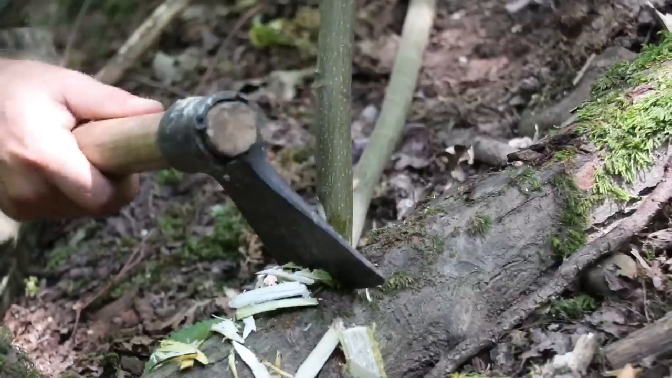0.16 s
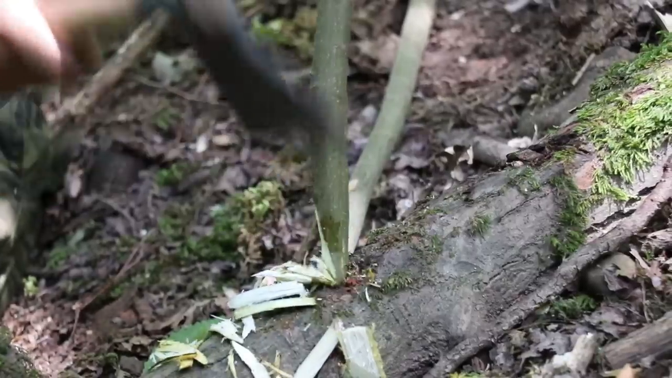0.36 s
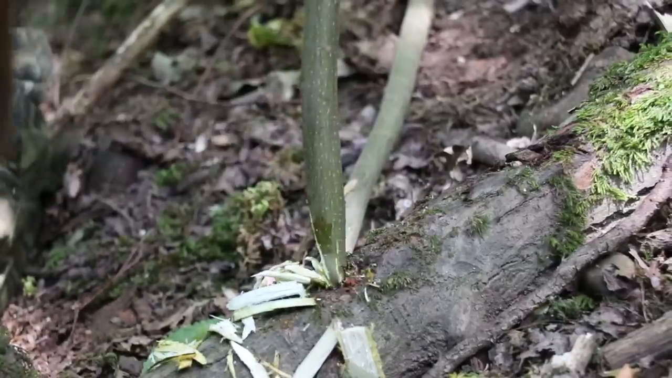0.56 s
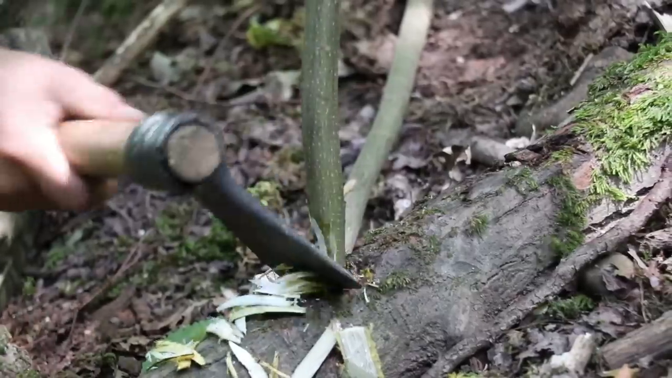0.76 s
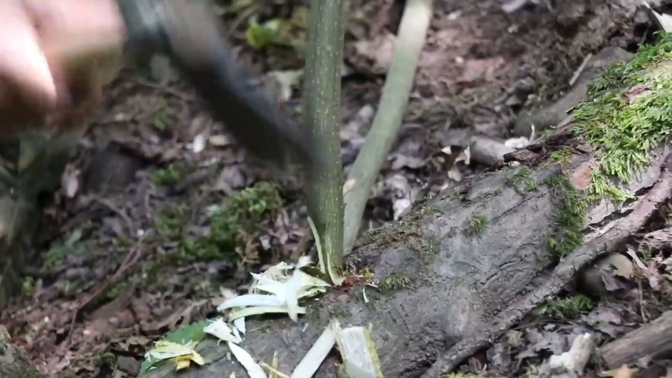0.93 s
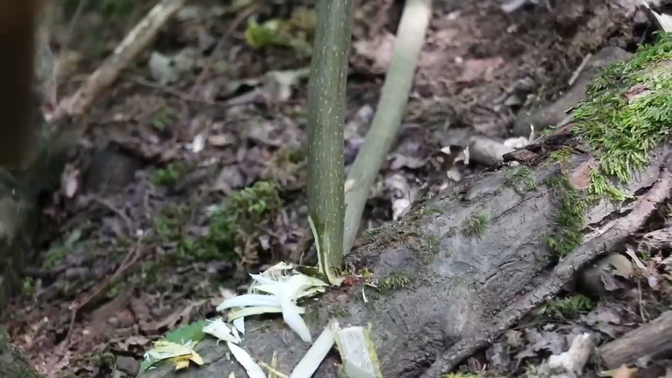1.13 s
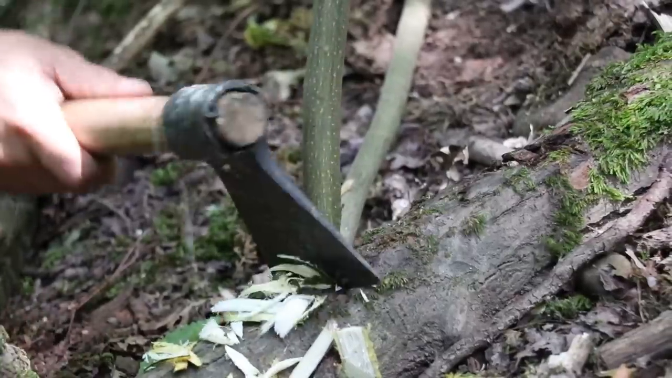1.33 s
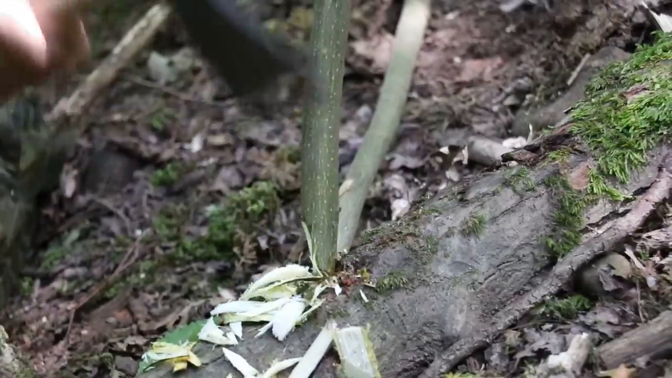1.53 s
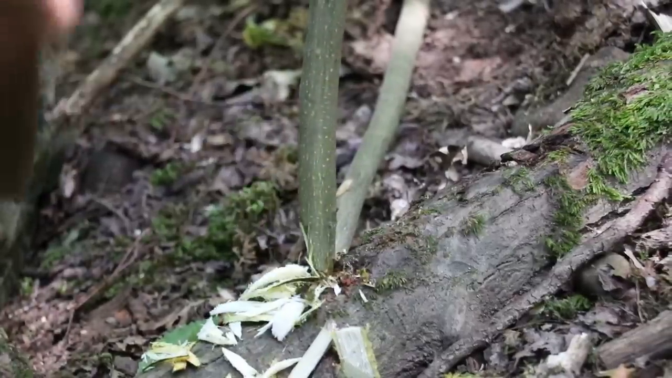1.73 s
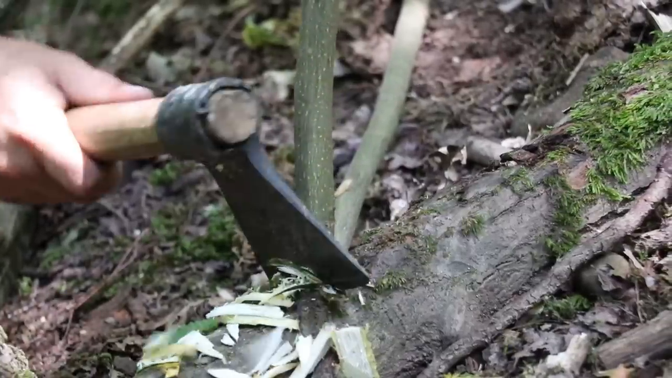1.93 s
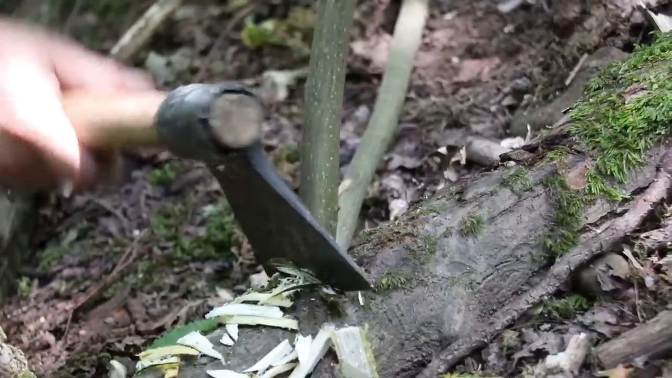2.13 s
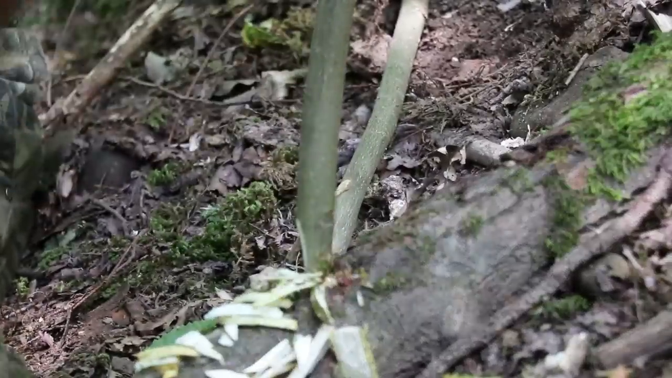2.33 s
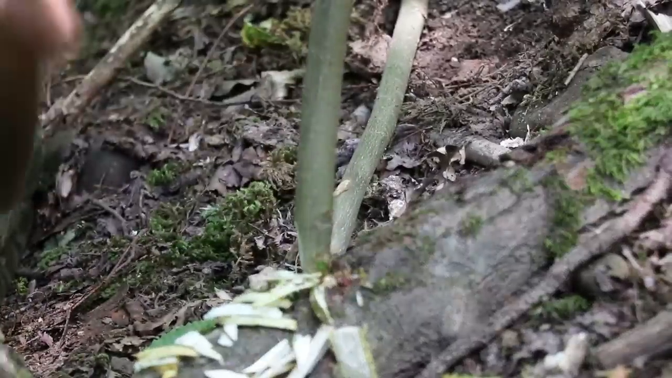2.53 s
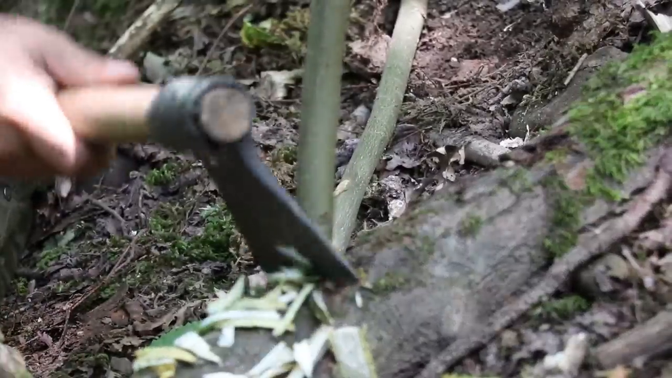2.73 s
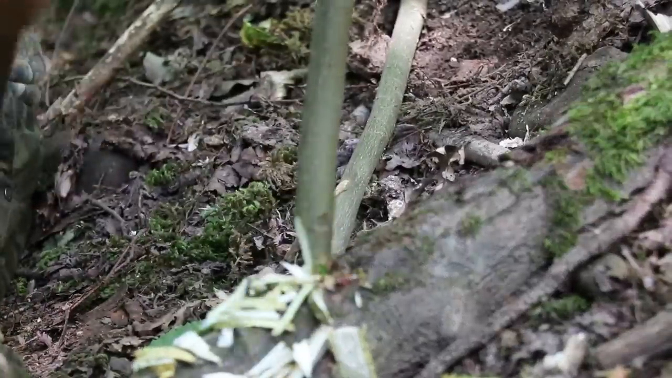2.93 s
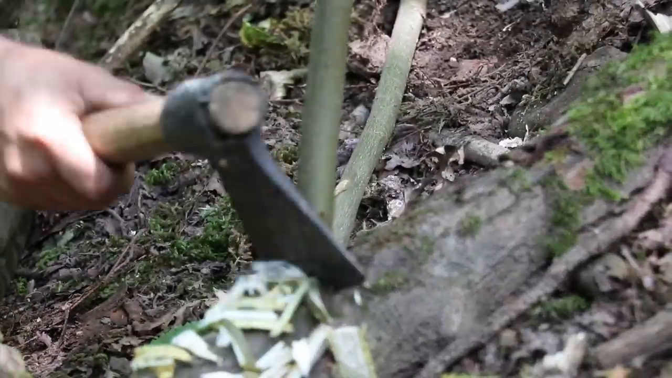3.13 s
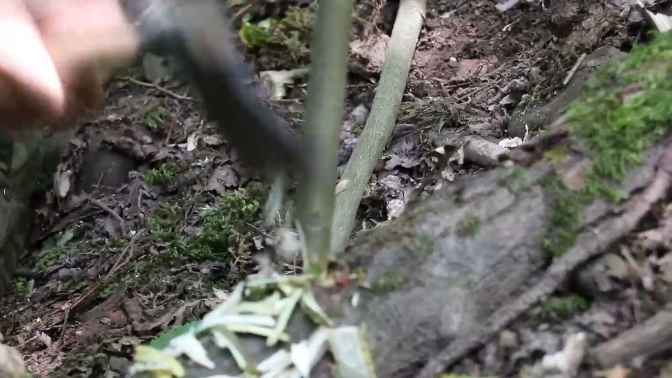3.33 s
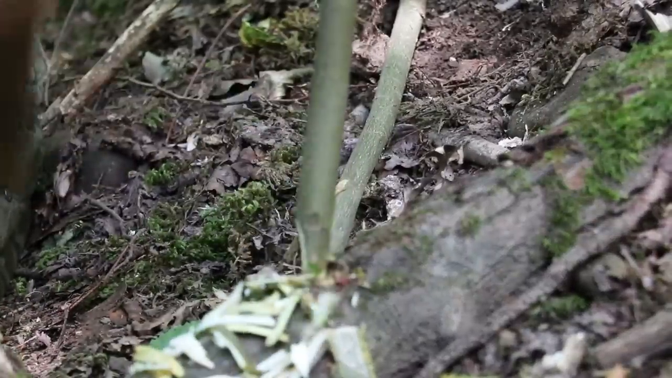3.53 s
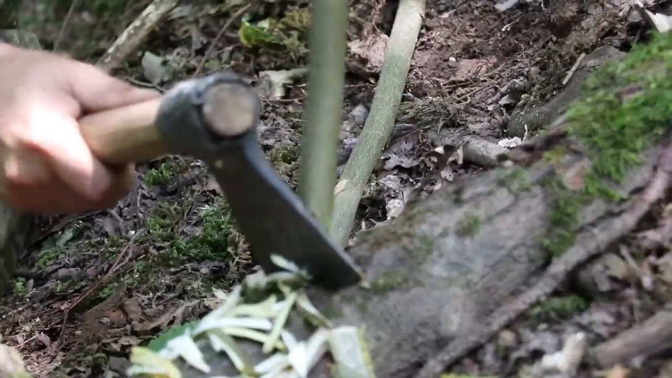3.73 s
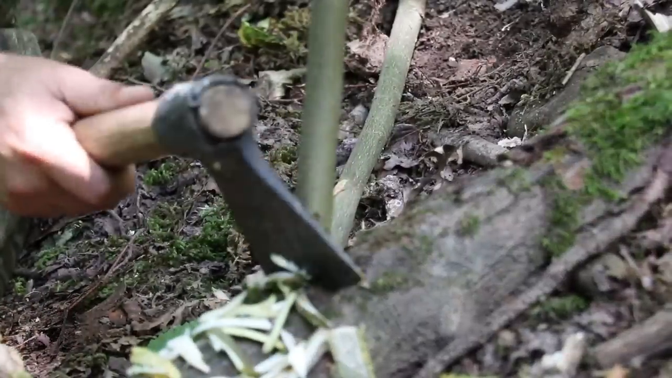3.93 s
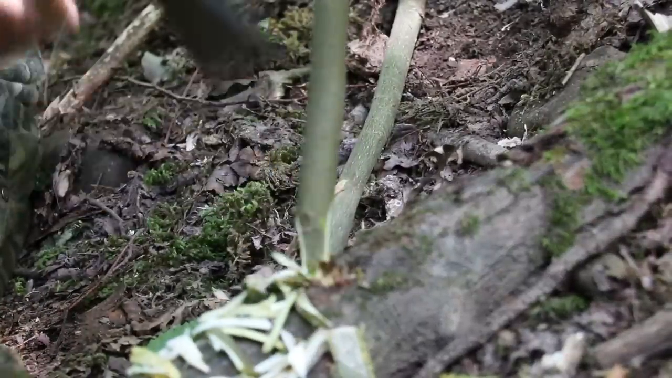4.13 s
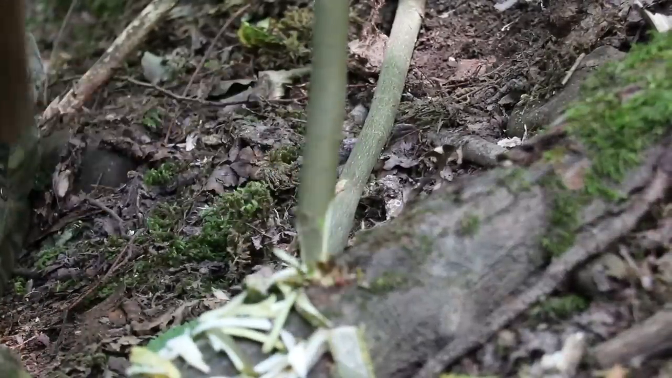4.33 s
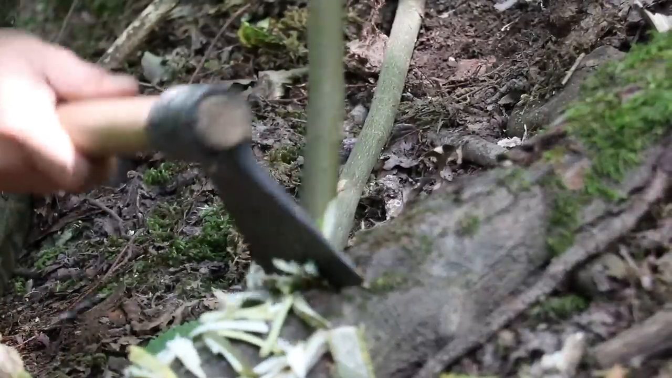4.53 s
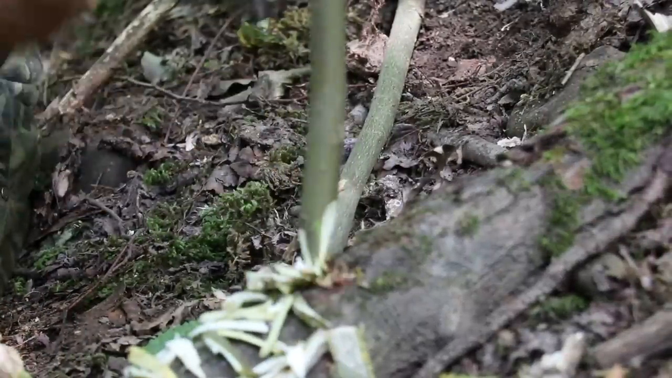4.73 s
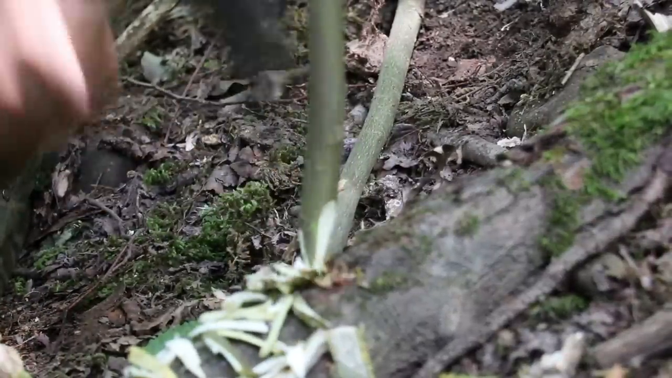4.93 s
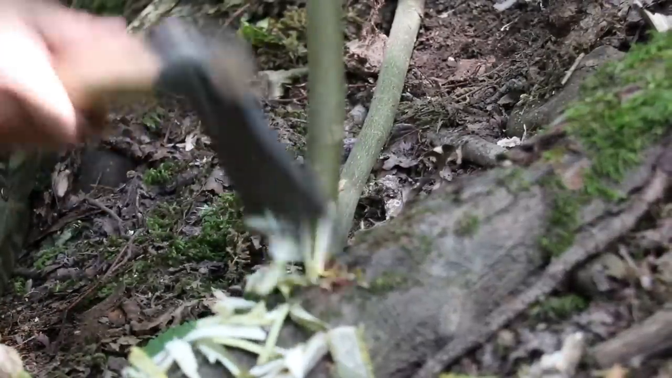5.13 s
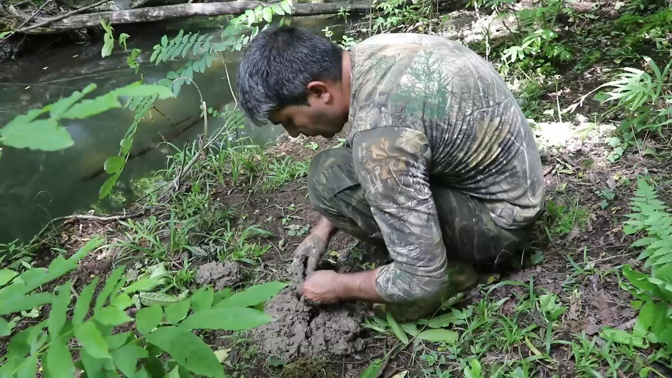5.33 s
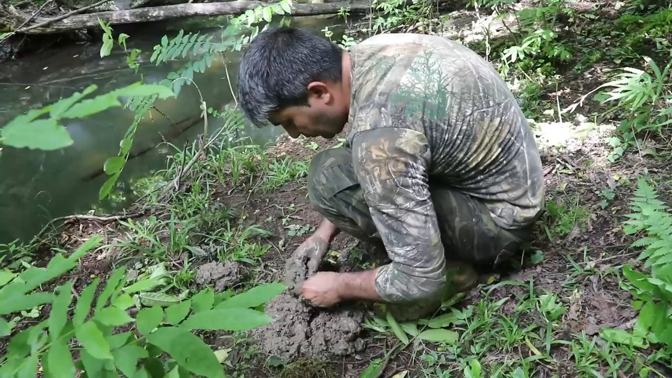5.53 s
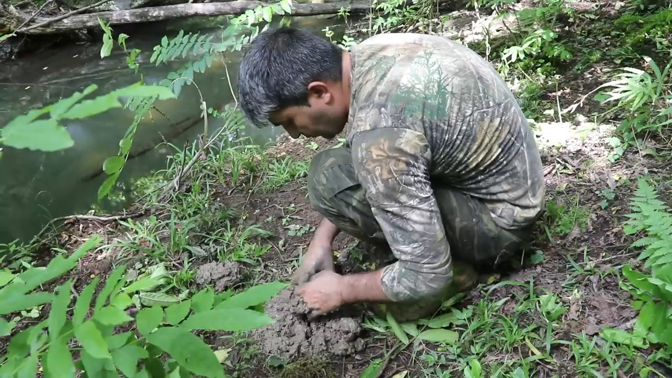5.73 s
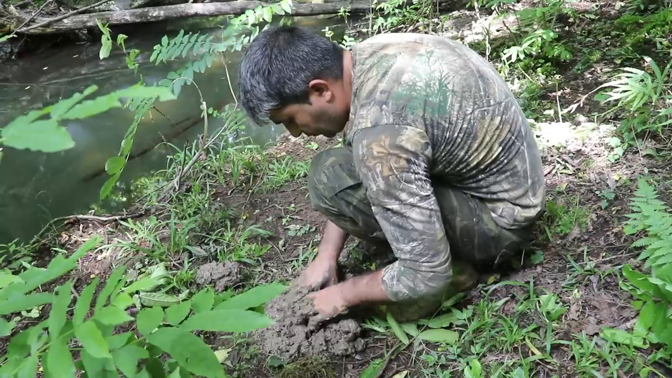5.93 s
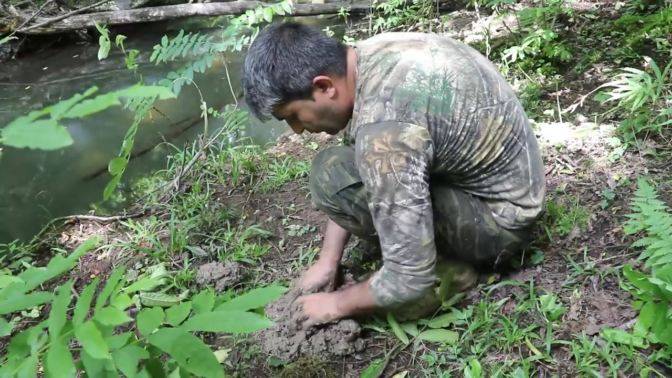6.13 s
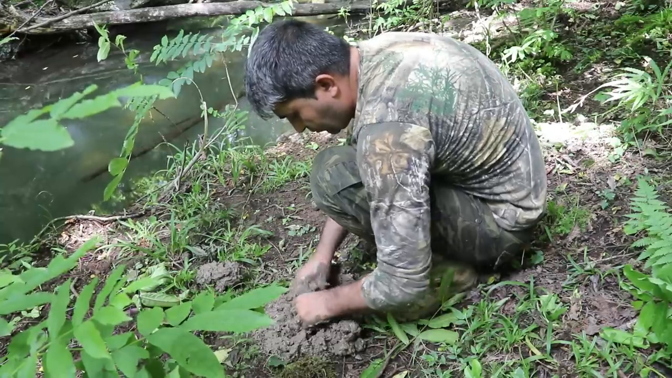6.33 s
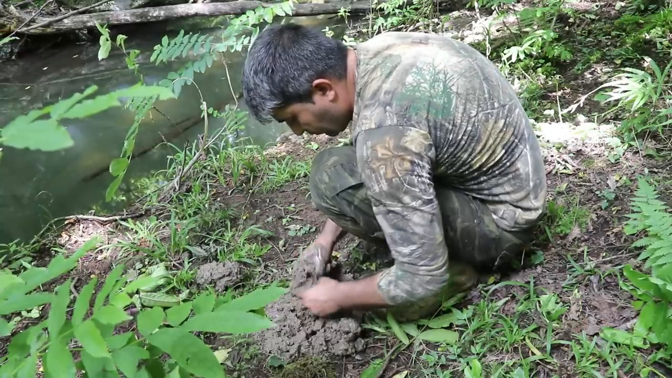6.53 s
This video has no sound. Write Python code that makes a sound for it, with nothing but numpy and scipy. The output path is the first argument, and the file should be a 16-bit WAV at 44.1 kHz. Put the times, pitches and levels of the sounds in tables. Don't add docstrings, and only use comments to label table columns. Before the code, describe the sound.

Nine loud, dry chops in a quiet forest, the first already landing at the start. Wet fibres rip briefly, snap, and the blade stops dead in wood with a low thump; the loudest blows clip slightly. Light hand taps, leaf ticks and thin distant birdsong fill the gaps. Then a hard cut brings a stream bank: soft, fuller water wash with scattered crumbling ticks of earth.

```python
import sys
import numpy as np
from scipy import signal
from scipy.io import wavfile
from scipy.ndimage import uniform_filter1d

SR = 44100
rng = np.random.default_rng(int(sys.argv[2]) if len(sys.argv) > 2 else 0)


def transcribe(u):
    v = np.clip(np.atleast_2d(u).T, -1, 1)
    q = np.round(v * 32767).astype(np.int16)
    wavfile.write(sys.argv[1], SR, q)


def boost_factor(decibels):
    exponent = np.asarray(decibels, float) / 20
    return 10 ** exponent


N = 294569

# frequency in Hz, density in dB per Hz.
FOREST_SPECTRUM = [(12, -34), (20, -7), (42, -5.5), (119, -3), (298, -1.5), (372, -5.5), (428, -6.5),
                   (465, -3.5), (535, -5.5), (1010, -7.5), (2340, -8), (4440, -11.5), (15500, -30)]
# frequency in Hz, density in dB per Hz.
STREAM_SPECTRUM = [(12, -56), (20, -26), (39, -12), (85, -3.5), (180, -5), (226, -2), (306, -5),
                   (506, -3.5), (908, -6), (1670, -6), (2210, -4.5), (7530, -13.5), (15500, -33.5)]
# frequency in Hz, likeness from -1 to 1.
LEFT_RIGHT_LIKENESS = [(60, 0.64), (180, 0.83), (550, 0.67), (1650, 0.25), (4970, 0.0808), (15000, -0.12)]
# end of the forest, start of the stream bank, in seconds.
SCENE_CHANGE = (5.3145, 5.3245)
CHANGE_FADES = (.001, .0012)

# time in seconds, thud in dB, knock in dB, knock pitch in Hz,
# overtone in dB.
BLOWS = [
    (-.0056, 4.5, -3, 657, -5),
    (0.8191, -3, -7.5, 570, -9.5),
    (1.3379, -1.5, -3.5, 586, -24),
    (1.8966, 0.5, -8.5, 594, -10.5),
    (2.6871, -2.5, -8, 488, -24),
    (3.2044, 0.8, 0.5, 525, -12),
    (3.7281, 0, 2, 564, -5),
    (4.5543, 0.4, -8, 560, -5),
    (5.0595, -0.4, -7, 513, -13),
]
# crack in dB, pitch in Hz, brightness in dB per octave,
# steel ring in dB.
CRACKS = [
    (-10.5, 4000, 1.5, -70),
    (-22, 7500, 1.1, -49),
    (-12, 2420, 1.3, -67),
    (-8, 2500, 0.5, -66),
    (-17, 3130, -5, -48),
    (-5, 2840, -4, -72.5),
    (-30, 1020, -18, -73),
    (-28, 2292, -2, -58),
    (-9, 4610, 2, -64),
]
# frequency in Hz, width in Hz, level in dB.
BLADE_RINGS = [(2200, 1000, -0.5), (3686, 50, 14), (4230, 430, -1.5), (5500, 1140, 3.5), (6530, 1200, 3),
               (9900, 1480, -2.5), (10700, 570, -1.5), (12500, 2000, -8), (14100, 2300, -13.5),
               (1100, 67, 5), (455, 376.5, -3.5)]
# frequency in Hz, level in dB, decay by 60 dB in seconds.
LOOSE_RINGS = [(4500, 1, .2), (6750, 1, 0.41)]
# frequency in Hz, level in dB, decay by 60 dB in seconds.
LOG_MODES = [(195.7, -1.5, 0.024), (161, -45, 0.11)]
# delay after the stop in seconds, frequency in Hz,
# level in dB.
GROUND_WAVES = [
    (0.0156, 233, -18),
    (0.02, 177, -14.5),
    (0.037, 82, -28),
    (.045, 42, -39),
    (0.07, 118, -33),
    (.074, 190, -40),
    (.084, 111, -39.5),
    (0.119, 61.6, -40),
]

# start in seconds, length in seconds, top pitch in Hz, level in dB.
WHISTLES = [
    (0.221, .23, 8700, -60.5),
    (2.695, .36, 9250, -63),
]
# time in seconds, peak in dB, length in seconds,
# left-over-right pan in dB.
TAPS = [
    (0.7816, -36, 0.0083, 1),
    (0.796, -35.5, 0.0068, -2),
    (1.3175, -45, 0.0061, 10),
    (3.183, -39, 0.0089, -5),
    (5.03, -30, 0.0071, -2),
    (5.3596, -37, 0.0043, -21),
]
# start in seconds, midway level in dB,
# exit level in dB, favoured ring in Hz, second ring in Hz.
CUTS = [
    (0.8052, -18.5, -25, 3970, 2133),
    (1.325, -18, -17, 2460, 4407),
    (1.884, -20.5, -16, 3800, 4355),
    (2.67, -16.5, -24.5, 6750, 3220),
    (3.191, -23, -20.5, 6300, 2250),
    (3.7133, -21, -22.5, 2200, 6676),
    (4.54, -21.5, -20.5, 3320, 2104),
    (5.0445, -24, -30, 4617, 1990),
]
# time in seconds, peak in dB, pitch in Hz, length in seconds,
# left-over-right pan in dB.
RUSTLES = [
    (1.53, -55, 9860, .0084, -6.5),
    (2.281, -50, 8400, 0.0065, 2.5),
    (3.377, -52, 7950, .0078, -9),
    (4.087, -52.5, 7900, 0.056, -8),
]
# start in seconds, end in seconds, pitch in Hz, width in Hz,
# level in dB.
FAR_SONG = [
    (2.22, 2.831, 3660, 300, -55.5),
    (2.253, 2.87, 4424, 503, -56),
    (2.853, 3.497, 2960, 1100, -53),
    (3.45, 3.72, 4160, 601.5, -58.5),
    (5.398, 5.749, 3030, 1600, -50),
]
# time in seconds, peak in dB, pitch in Hz, width in Hz,
# left-over-right pan in dB.
CRUMBS = [(5.033, -37, 2424, 2946, .6), (5.365, -34, 3960, 4000, -13), (5.408, -41, 5500, 2500, -4),
          (5.525, -50, 12500, 5000, -5.5), (5.6935, -29, 5000, 1300, -5), (5.7132, -27, 4900, 5500, -7),
          (6.0414, -34.5, 7500, 1800, -3), (6.0978, -32, 2300, 1200, -3), (6.0995, -40, 5500, 2500, -9.5),
          (6.189, -38, 4000, 4000, -1.5), (6.305, -36, 2200, 1601, -7), (6.3053, -39, 4692, 1200, -1.1),
          (6.367, -43, 10000, 5000, -7), (6.428, -47.5, 10500, 2000, -1.1), (6.478, -35.5, 4580, 800, -2.1)]

LEAD = 512
FOREST_DB, STREAM_DB = -47, -42.5
RUN_UP_S, KNOCK_LAG_S = 0.005, 0.001667
KNOCK_CYCLES, OVERTONE_HZ = 1.21, 770
WAVE_CYCLES, WAVE_SPREAD = 0.39, 4
PING_DB, PING_T60_S = -6, 0.012
REST_HZ, GLIDE_SHARE, WHISTLE_FADE_DB = 7800, 0.27, -7
TAP_HZ, TAP_WIDTH_HZ = 500, 1330
RUSTLE_WIDTH_HZ, CRUMB_S = 2900, 0.0022
ENTRY_DB, OVERRUN_S, CUT_BRIGHT_DB = -5.5, 0.0017, -0.75
BITE_DB, SECOND_BITE_DB = 1.5, -3


def evened(x):
    return x / np.sqrt(np.mean(x ** 2) + 1e-20)


def seconds(length):
    return np.arange(round(length * SR)) / SR


def read(points, hz):
    f, value = np.transpose(points)
    return np.interp(np.log(hz + 1), np.log(f + 1), value)


def add(mix, s, sound, pan_db=0):
    part = mix[:, round(s * SR) + LEAD:][:, :sound.shape[-1]]
    panned = sound * boost_factor(np.array([[pan_db / 2], [-pan_db / 2]]))
    part += panned[:, :part.shape[1]]


def resonate(x, hz, width):
    r = np.exp(-np.pi * width / SR)
    return 2 * signal.lfilter([1 - r], [1, -r * np.exp(2j * np.pi * hz / SR)], x).real


def pair(size, apart):
    a, b = rng.standard_normal((2, size))
    return np.array([a + apart * b, a - apart * b])


def bed(spectrum, level_db, patchy_db, tilt_db):
    frames, hz = N // 256 + 5, np.fft.rfftfreq(1024, 1 / SR)
    a, b, c, d, patches = rng.standard_normal((frames, 513, 5)).T
    patches = uniform_filter1d(patches, size=12, axis=0)
    patches = evened(uniform_filter1d(patches, size=14, axis=1))
    same = np.clip(read(LEFT_RIGHT_LIKENESS, hz), -1, 1)[:, None]
    left = a + 1j * b
    right = same * left + np.sqrt(1 - same ** 2) * (c + 1j * d)
    gusts = evened(uniform_filter1d(rng.standard_normal(frames), size=40))
    gusts = gusts * (hz[:, None] < 130)
    shape_db = read(spectrum, hz)[:, None] + patchy_db * patches + 0.71 * gusts
    z = np.array([left, right]) * boost_factor(shape_db)
    wash = evened(signal.istft(z, nperseg=1024, noverlap=768)[1][:, :N])
    return wash * boost_factor(level_db + np.array([[tilt_db], [-tilt_db]]))


def steel(drive, bright_db, *favoured):
    rings = 0
    for k, (hz, width, db) in enumerate(BLADE_RINGS):
        gain = (-1) ** k * boost_factor(db + bright_db * np.log2(hz / 4000))
        rings = rings + gain * resonate(drive, hz, width)
    for hz, db in favoured:
        rings = rings + boost_factor(db) * resonate(drive, hz, 330.0)
    return rings


def last_fibres(crack_db, crack_hz, bright_db, ring_db):
    t = seconds(0.35)
    snap = t / 0.00093 * np.exp(1 - t / 0.0009)
    crack = boost_factor(crack_db) * snap * evened(steel(pair(len(t), 0.33), bright_db, (crack_hz, 8.0)))
    top_hz = min(12000 * boost_factor(1.8 * bright_db), 20000)
    crack = signal.lfilter(*signal.butter(2, top_hz, fs=SR), crack)
    ping = boost_factor(crack_db + PING_DB - 60 * t / PING_T60_S) * np.sin(2 * np.pi * crack_hz * t)
    rings = sum(boost_factor(ring_db + db - 60 * t / t60) * np.sin(2 * np.pi * hz * t) for hz, db, t60 in LOOSE_RINGS)
    return crack + ping * np.minimum(t / 0.0019, 1) + rings * np.minimum(t / 0.004, 1)


def log_and_ground(thud_db):
    t = seconds(0.35)
    late = np.maximum(t - 0.0038, 0)
    log = sum(boost_factor(db - 60 * late / t60) * np.sin(2 * np.pi * hz * late) for hz, db, t60 in LOG_MODES)
    grain = evened(resonate(pair(len(t), 0.56), 220, 125.0))
    log = log + boost_factor(-17.5 - 60 * t / 0.051) * grain * np.minimum(t / 0.0035, 1)
    log = signal.filtfilt(*signal.butter(2, 95, "high", fs=SR), log)
    waves = 0
    for delay, hz, db in GROUND_WAVES:
        cycles = WAVE_CYCLES + WAVE_SPREAD * delay
        swell = np.exp(-((t - delay) * hz / cycles) ** 2)
        waves = waves + boost_factor(db) * swell * np.cos(2 * np.pi * hz * (t - delay))
    chips = evened(resonate(pair(len(t), 0.2), 215, 220.4)) * (late > 0)
    soil = evened(resonate(pair(len(t), 0.18), 68, 70)) * np.minimum(t / 0.027, 1)
    shiver = boost_factor(-39 - 60 * late / 0.26) * chips + boost_factor(-39 - 60 * t / 0.47) * soil
    return boost_factor(thud_db) * (log + shiver - waves * boost_factor([[-1.2], [1.2]]))


def knock(db, hz, overtone_db):
    t = seconds(0.4) - RUN_UP_S + np.array([[-0.00003], [0.00003]])
    size = t.shape[1]
    sagging = t - 45 * t * np.minimum(abs(t), 0.006)
    swing = np.exp(-((t - 0.0003) * hz / KNOCK_CYCLES) ** 2)
    body = -swing * (np.cos(2 * np.pi * hz * sagging) + boost_factor(overtone_db) * np.cos(2 * np.pi * OVERTONE_HZ * t))
    fading = (boost_factor(-12.5 - 60 * t / 0.014) + boost_factor(-51.5 - 60 * t / 1.36)) * (t > 0)
    rattle = fading * evened(resonate(pair(size, 0.47), 520, 530))
    woody = boost_factor(-34 - 60 * t / 0.11) * (t > 0) * evened(resonate(pair(size, 0.62), 810, 400))
    no_rumble = signal.butter(2, 110, "high", fs=SR)
    return boost_factor(db) * signal.filtfilt(*no_rumble, body + rattle + woody)


def trees(x):
    t = seconds(0.4)
    decay = boost_factor(-60 * t / 0.047) + boost_factor(-20 - 60 * t / 0.85)
    tail = rng.standard_normal((2, len(t))) * decay * np.clip(t / 0.0035 - 1, 0, 1)
    tail = signal.lfilter(*signal.butter(1, [600, 13000], "band", fs=SR), tail)
    return signal.fftconvolve(x, tail / np.linalg.norm(tail[0]), axes=1)[:, :x.shape[1]]


def whistle(length, top_hz, db):
    t = np.arange(0, length, 1 / SR)
    hz = REST_HZ + (top_hz - REST_HZ) * np.exp(-(t / (GLIDE_SHARE * length)) ** 1.5)
    flutter = evened(uniform_filter1d(rng.standard_normal((2, len(t))), size=300))
    phase = 2 * np.pi * np.cumsum(hz + 100 * flutter[0]) / SR
    level_db = db + WHISTLE_FADE_DB * (t / length) ** 2 + 7.7 * flutter
    return np.sin(phase) * np.minimum(t / 0.012, 1) * boost_factor(level_db)


def touch(db, hz, width, length):
    t = np.arange(round(4 * length * SR) + 64) / SR
    band = signal.butter(3, [max(hz - width / 2, 100), min(hz + width / 2, 20000)], "band", fs=SR)
    shape = np.minimum(t / 0.0017, 1) * np.exp(-(t / length) ** 2)
    burst = signal.lfilter(*band, pair(len(t), 0.30464) * shape)
    return boost_factor(db + 4.0) * burst / abs(burst).max()


def cut(length, middle_db, end_db, hz, other_hz):
    t = seconds(length + 0.018)
    strength = np.minimum(rng.exponential(1, len(t)), 3)
    cracks = boost_factor(4.5 * np.repeat(strength, 8)[:len(t)])
    drive = pair(len(t), 0.41) * cracks
    sound = evened(steel(drive, CUT_BRIGHT_DB, (hz, BITE_DB), (other_hz, SECOND_BITE_DB)))
    level_db = np.interp(t, [0, length / 2, length, length + 0.007, length + 0.015715],
                         [middle_db + ENTRY_DB, middle_db, end_db, end_db - 31, end_db - 48])
    return sound * boost_factor(level_db) * np.minimum(t / 0.0014, 1)


def far_song(length, hz, width, db):
    size = round(length * SR)
    note = resonate(resonate(pair(size, 0.908), hz, width), hz, width)
    return boost_factor(db) * evened(note) * signal.windows.tukey(size, 0.5)


def scene():
    chops, small = np.zeros((2, 2, N + LEAD))
    for (s, thud_db, *hollow), fibres in zip(BLOWS, CRACKS):
        add(chops, s, last_fibres(*fibres) + log_and_ground(thud_db), -0.8)
        add(chops, s + KNOCK_LAG_S - RUN_UP_S, knock(*hollow), -0.3)
    for s, *call in WHISTLES:
        add(small, s, whistle(*call))
    for s, db, length, pan_db in TAPS:
        add(small, s, touch(db, TAP_HZ, TAP_WIDTH_HZ, length), pan_db)
    for (s, *shave), blow in zip(CUTS, BLOWS[1:]):
        add(chops, s, cut(blow[0] + OVERRUN_S - s, *shave), -0.4)
    for s, db, hz, length, pan_db in RUSTLES:
        add(small, s, touch(db, hz, RUSTLE_WIDTH_HZ, length), pan_db)
    for s, end, *note in FAR_SONG:
        add(small, s, far_song(end - s, *note))
    for s, *crumb, pan_db in CRUMBS:
        add(small, s, touch(*crumb, CRUMB_S), pan_db)
    near = (chops + boost_factor(-23.5) * trees(chops) + small)[:, LEAD:]
    t = np.arange(N) / SR
    before = np.clip((SCENE_CHANGE[0] - t) / CHANGE_FADES[0], 0, 1)
    after = np.clip((t - SCENE_CHANGE[1]) / CHANGE_FADES[1], 0, 1)
    forest = bed(FOREST_SPECTRUM, FOREST_DB, patchy_db=0.8, tilt_db=-0.19)
    stream = bed(STREAM_SPECTRUM, STREAM_DB, patchy_db=0.8, tilt_db=-0.7345)
    return (near + forest) * before + (near + stream) * after


def band_limit(x):
    return signal.sosfilt(signal.butter(12, 15690, fs=SR, output="sos"), x)


def record(dry):
    return band_limit(np.clip(dry, -1, 1))


dry = scene()
out = record(dry)
transcribe(out)
```